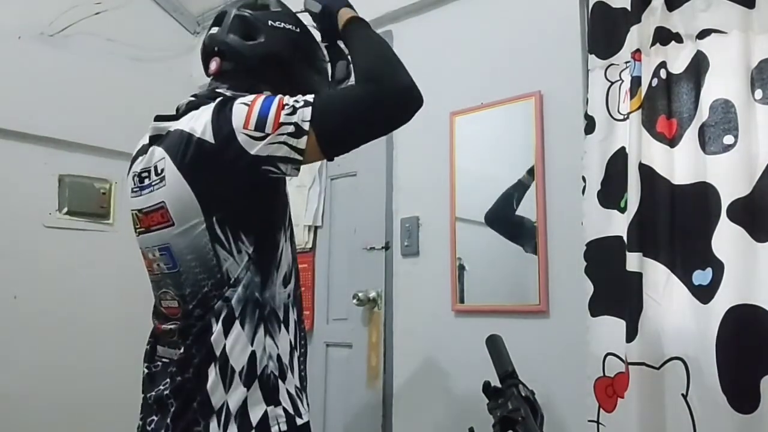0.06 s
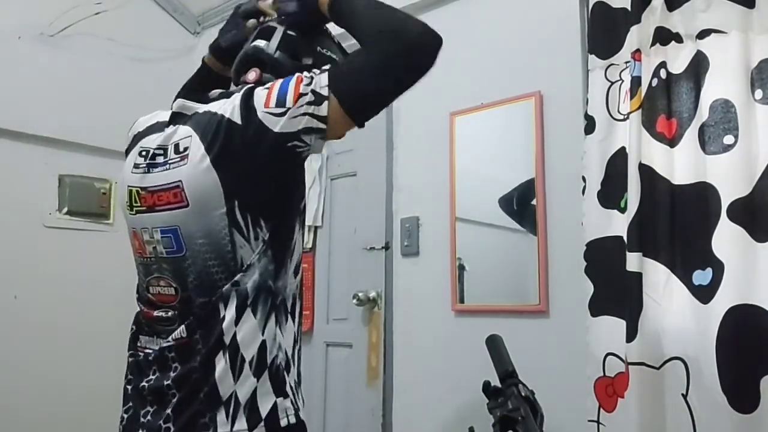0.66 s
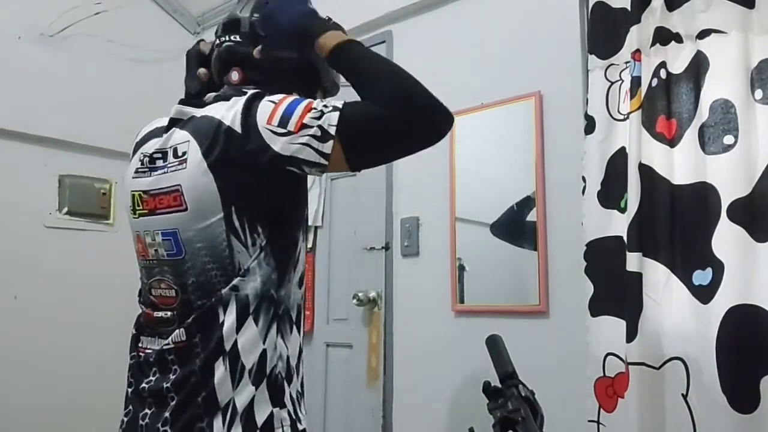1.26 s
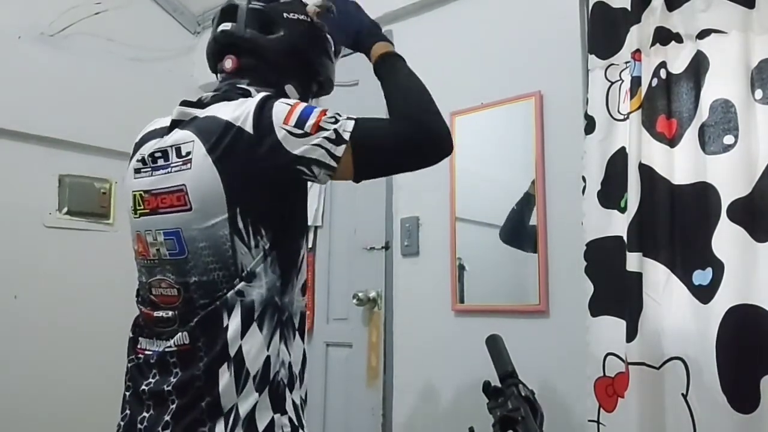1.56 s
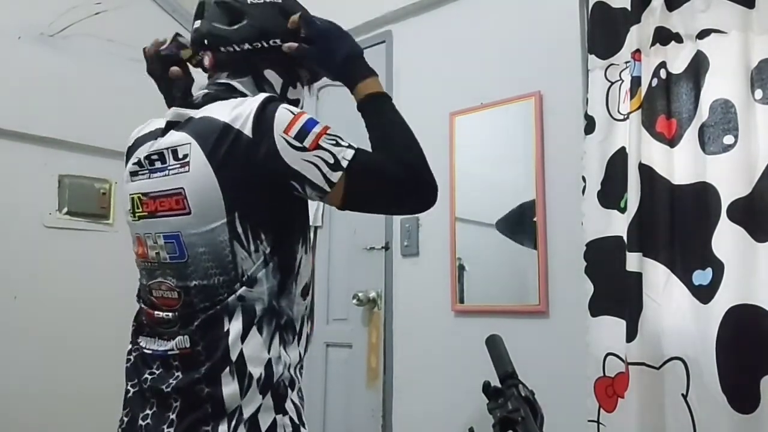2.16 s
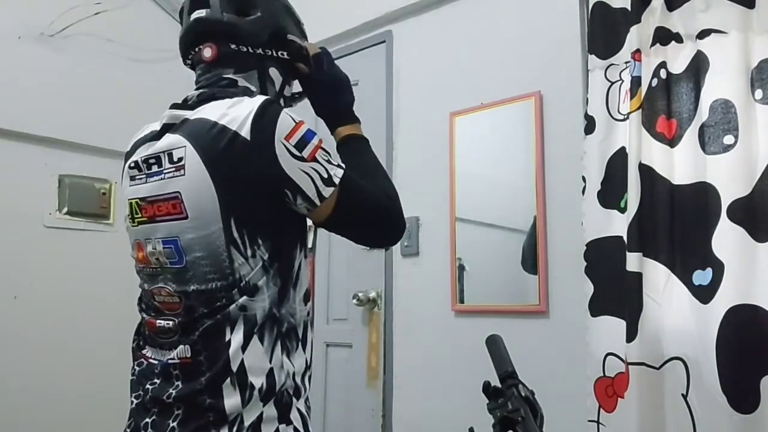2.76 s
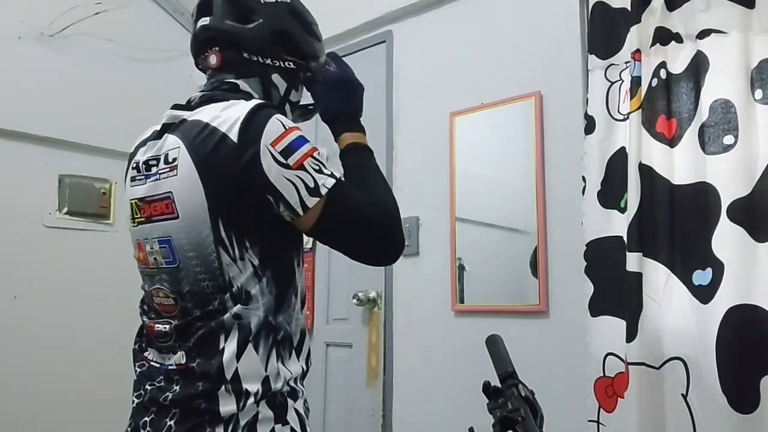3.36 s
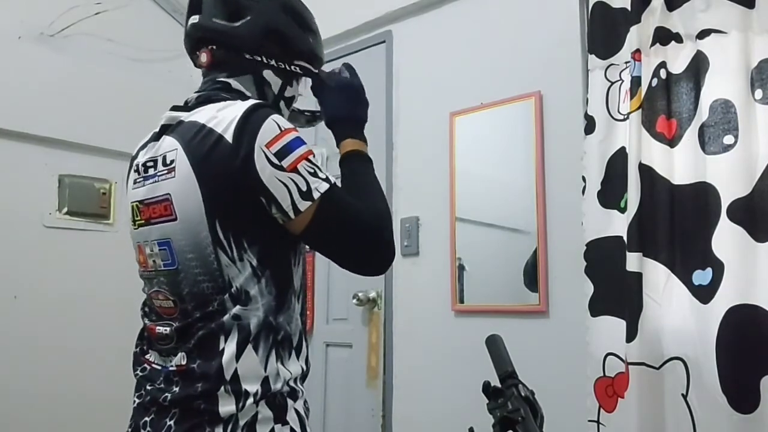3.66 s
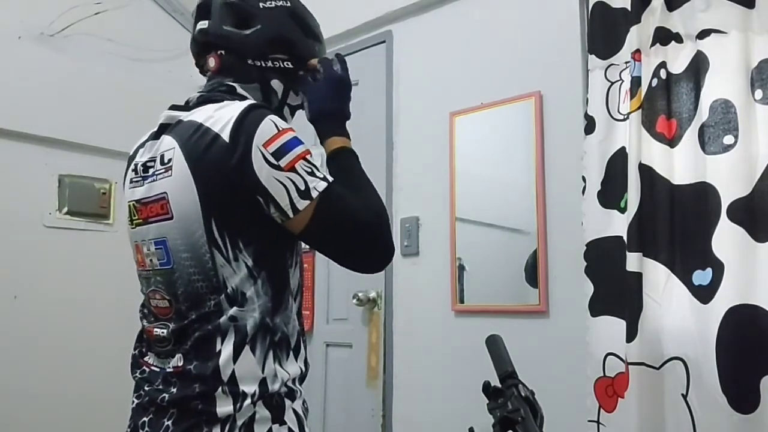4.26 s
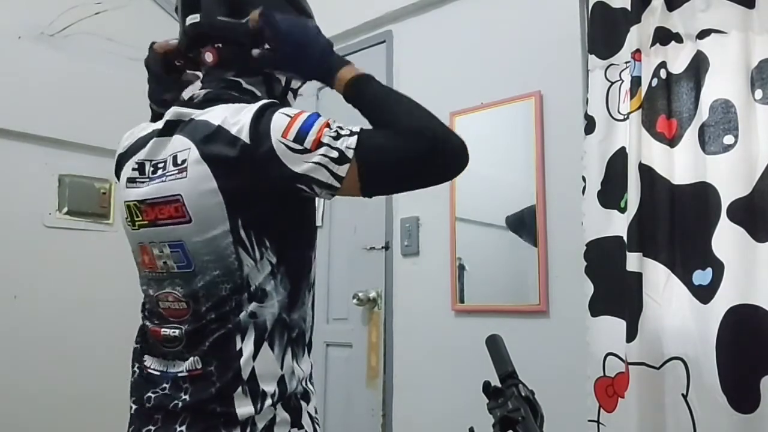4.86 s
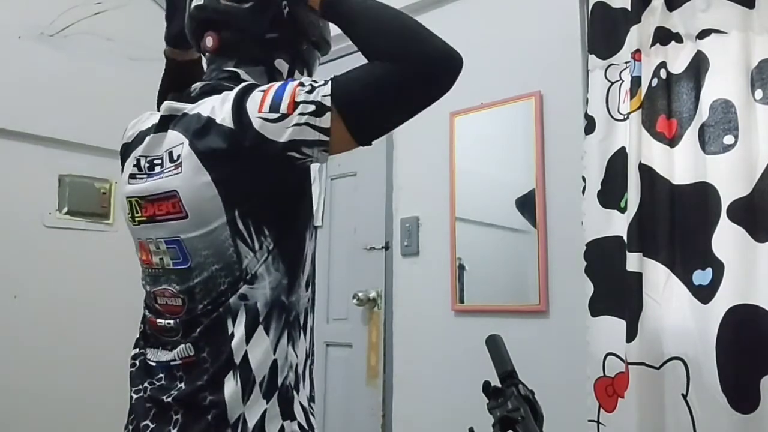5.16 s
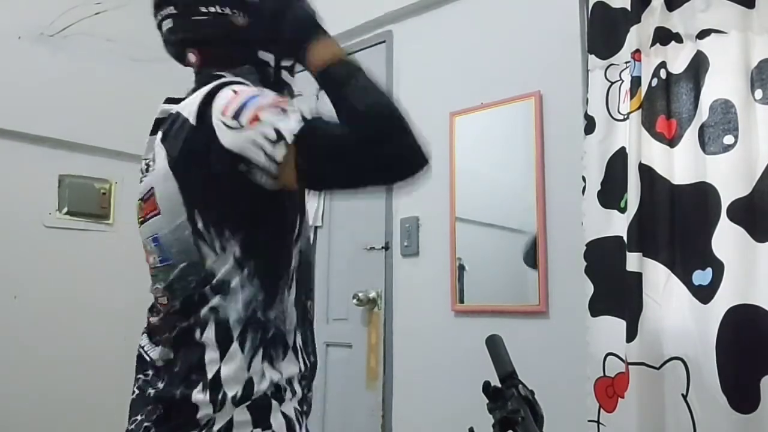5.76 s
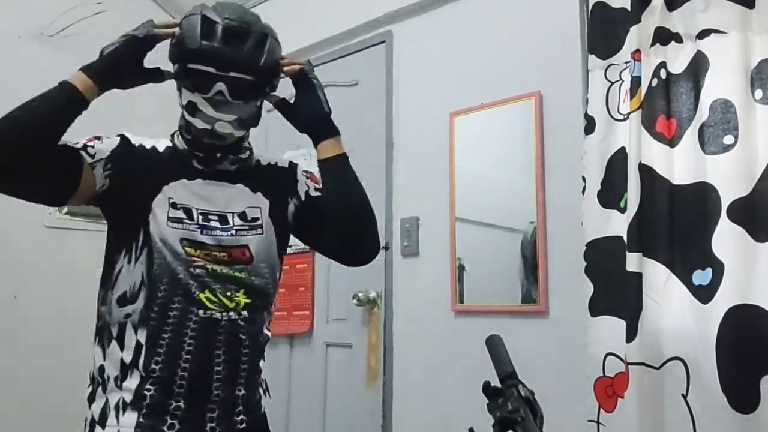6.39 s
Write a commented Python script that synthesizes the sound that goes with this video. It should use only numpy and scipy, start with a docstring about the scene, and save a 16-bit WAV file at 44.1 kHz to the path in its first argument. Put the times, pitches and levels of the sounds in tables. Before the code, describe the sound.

Light plastic clicks open the scene as a helmet is pushed into place, followed by swishes of gloves and a cloth mask. Two sharper snaps stand out before a quieter stretch of small ticks; then come muffled palm thuds, more rustling and a few more taps. Everything is heard from a few steps away, with short echoes from a small room, a soft steady rush and occasional faint, high chirps.

```python
"""Taps, thuds and rubbing: gloved hands settle a cycling helmet, glasses and a cloth mask.
Plastic parts snap against the shell and make it ring briefly, and palms thud on the padding.
Gloves and cloth hiss as their fibres catch and let go. Faint, high chirps come and go.
The small, hard-walled room has a low rush of its own. The microphones stand a few steps away,
so every sound arrives mixed with its echoes from the walls."""
import sys
import numpy as np
from scipy import signal
from scipy.fft import rfft, irfft
from scipy.io import wavfile
from scipy.ndimage import uniform_filter1d

SR = 44100
rng = np.random.default_rng(int(sys.argv[2]) if len(sys.argv) > 2 else 0)


def unload_wav(signal):
    """Save mono or channel-first audio to the path in sys.argv[1] as 16-bit WAV at rate SR, clipped to [-1, 1]."""
    wavfile.write(
        sys.argv[1],
        SR,
        np.round(np.clip(np.atleast_2d(signal).T, -1, 1) * 32767).astype(np.int16),
    )


N = 287861
TIME = np.arange(N) / SR

# tones of the helmet shell and its air pockets: (pitch [Hz], time to fade by 60 dB [s], level [dB])
SHELL_TONES = [(348, 0.014, 0), (590, 0.015, 0.5), (745, 0.028, -2), (847, 0.018, -1.5), (1044.6, 0.027, 0),
               (1063.4, 0.022, 1.5), (1205, 0.012, 1), (1330, 0.012, 0)]
# tones of the stiff rim, dial and glasses: (pitch [Hz], time to fade by 60 dB [s], level [dB])
RIM_TONES = [(1426, 0.0088, 2.5), (1723, 0.034, -3.5), (2010, 0.0098, 3.5), (2486, 0.011, 3),
             (2747, 0.0094, 0.5), (3344, 0.0079, -4.5), (3910, 0.035, -10.5), (4570, 0.003, -6.5)]
# the sharp snap that starts a tap: (frequency [Hz], level [dB])
SNAP_SPECTRUM = [(300, -71), (1500, -4.5), (3500, 0.5), (5500, -4.5), (7500, 1.5), (10500, -7),
                 (14000, -8.5), (16000, -7)]


def undb(db):
    """Turn decibels into a number to multiply a sound by."""
    return 10 ** (np.asarray(db) / 20)


def unit(x):
    """Scale a signal to an average size (rms) of 1."""
    return x / np.sqrt(np.mean(x ** 2))


def along(points, hz):
    """Read between (frequency, value) points, with every octave equally wide."""
    frequencies, values = np.transpose(points)
    return np.interp(np.log(hz + 1), np.log(frequencies), values)


def bins(x):
    """The frequencies in the spectrum of x."""
    return np.fft.rfftfreq(x.shape[-1], 1 / SR)


def colour(x, points):
    """Turn each frequency up or down, following (frequency [Hz], gain [dB]) points."""
    return irfft(rfft(x) * undb(along(points, bins(x))), x.shape[-1])


def walk(per_s):
    """A smooth random wobble of size 1 that finds a new value per_s times a second."""
    step = int(SR / per_s)
    stairs = np.repeat(rng.standard_normal(N // step + 1), step)
    return unit(uniform_filter1d(stairs, step)[:N])


def diffuse(pair):
    """Sound from all sides of a room is alike left and right in the bass, but not in the treble."""
    # how alike the two channels are: (frequency [Hz], likeness [0 to 1])
    likeness = [(40, 0.77), (150, 0.93), (350, 0.72), (700, 0.44), (1300, 0), (15000, 0)]
    alike = along(likeness, bins(pair))
    mid, side = rfft(pair)
    mid, side = mid * np.sqrt(1 + alike), side * np.sqrt(1 - alike)
    return irfft([mid + side, mid - side], pair.shape[-1])


def room(rise_s=0.0016, size=12000, early_db=-1, tail_db=1):
    """An echo pattern: a cluster of tiny impacts and near echoes, then a tail that dulls as it fades."""
    # how long the room rings: (frequency [Hz], time to fade by 60 dB [s])
    echo_times = [(150, 0.32), (1000, 0.17), (4000, 0.21), (14000, 0.16)]
    t = np.arange(size) / SR
    rise = t / rise_s
    early = rng.standard_normal((2, size)) * rise ** 2 * np.exp(-2 * rise)
    early /= np.linalg.norm(early, axis=1, keepdims=True)
    noise, tail = rfft(rng.standard_normal((2, size))), 0
    centres, fade_times = np.transpose(echo_times)
    for band, fade_s in zip(np.eye(len(centres)), fade_times):
        share = along(np.transpose([centres, band]), bins(t))
        fade = np.exp(-np.log(1000) * t / fade_s)
        tail = tail + irfft(noise * share, size) * fade * (1 - np.exp(-rise))
    tail /= np.linalg.norm(tail, axis=1, keepdims=True)
    return diffuse(undb(early_db) * early + undb(tail_db) * tail)


def heard(x, echoes):
    """Carry a sound through the room's echo pattern."""
    return signal.fftconvolve(np.atleast_2d(x), echoes, axes=1)


def blurred(x):
    """The walls smear a long sound, leaving it about as loud."""
    echoes = room()
    return heard(x, echoes / np.linalg.norm(echoes, axis=1, keepdims=True))[:, :N]


def add(out, time_s, sound, db, size=880):
    """Mix in a sound so that its first `size` samples have the level db."""
    start = int(time_s * SR)
    gain = undb(db) / np.sqrt(np.mean(sound[:, :size] ** 2))
    out[:, start:start + sound.shape[1]] += gain * sound[:, :N - start]


def ring(tones, spot_hz=2000, focus_db=0, detune=0.029, scatter_db=0.5, size=2400):
    """Struck plastic rings in fading tones, each shifted a little by the grip."""
    hz, fade_s, db = np.transpose(tones)[:, :, None]
    shift, strength = rng.standard_normal((2, len(tones), 1))
    # a tone loses focus_db for each octave it lies from spot_hz
    db = db - focus_db * abs(np.log2(hz / spot_hz)) + scatter_db * strength
    t = np.arange(size) / SR
    signs = (-1) ** np.arange(len(tones))[:, None]
    waves = signs * np.sin(2 * np.pi * hz * (1 + detune * shift) * t)
    sound = np.sum(undb(db) * waves * np.exp(-np.log(1000) * t / fade_s), axis=0)
    # a small object gives off little sound below its lowest tone
    bass_cut = signal.butter(2, 0.41 * hz.min(), "high", fs=SR, output="sos")
    return signal.sosfilt(bass_cut, sound)


def pulse(spectrum, size=2048):
    """One sudden push: the shortest pulse with the given (frequency [Hz], level [dB]) spectrum."""
    cepstrum = irfft(np.log(undb(along(spectrum, bins(np.zeros(size))))))
    # folding the second half onto the first packs the energy at the start
    cepstrum[1:size // 2] *= 2
    cepstrum[size // 2 + 1:] = 0
    return irfft(np.exp(rfft(cepstrum)))


def room_air(level_db=-62.5, waver_db=2.05):
    """The low rush and hiss of the room, wavering gently."""
    # the room's background noise: (frequency [Hz], relative level [dB])
    air_spectrum = [(15, -36), (25, -4), (55, -9), (113, 2), (193, 1), (457, -6.5), (537, -8), (741, -13),
                    (848, -16), (1340, -28.5), (2560, -12.5), (5580, -20.5), (7910, -22), (14300, -28),
                    (15500, -59)]
    rush = unit(colour(diffuse(rng.standard_normal((2, N))), air_spectrum))
    return rush * undb(level_db + waver_db * walk(5.94))


def friction(db, spectrum, uneven_db, slips_per_s=3000):
    """Fibres catch and let go: many tiny slips over a smooth hiss, under a wavering pressure."""
    slips = (rng.random((2, N)) < slips_per_s / SR) * rng.choice([-1, 1], (2, N))
    rough_hiss = unit(slips) + rng.standard_normal((2, N))
    return unit(colour(diffuse(rough_hiss), spectrum)) * undb(db + uneven_db * walk(40))


def rubbing_hands(speed_up_share=0.59):
    """Gloves rub and tick on the shell while mask and straps hiss; each stroke speeds up, then stops."""
    # how busy the hands are between strokes: (time [s], relative level [dB])
    fidgeting = [(0, -61.5), (0.5, -57), (0.85, -71), (1.8, -59.5), (2.6, -59.5), (3.1, -68), (4.6, -64.5),
                 (5.45, -62), (5.95, -68.5), (6.5, -65.5)]
    # hand strokes: (fastest moment [s], length [s], relative glove level [dB], cloth level [dB])
    strokes = [(0.221, .14, -63, -49.5), (0.676, 0.63, -58, -52), (0.987, .22, -46, -50.5),
               (1.09, 0.17, -58.5, -52), (1.261, 0.27, -54.5, -48.5), (1.488, 0.12, -47, -46),
               (1.63, 0.23, -56.5, -62), (1.745, .1, -49.5, -68), (1.951, 0.16, -53.5, -52.5),
               (2.059, 0.18, -51.5, -47), (2.247, 0.24, -57, -52.5), (2.415, 0.16, -56, -68),
               (2.55, 0.21, -53, -58), (2.716, 0.096, -46, -63), (3.235, 0.069, -59, -73),
               (3.678, 0.073, -58.5, -60), (4.243, 0.31, -62, -62), (4.55, 0.17, -58.5, -57),
               (5.145, 0.39, -57.5, -51.5), (5.358, 0.11, -65, -44.5), (5.648, 0.074, -51, -55),
               (6.146, .12, -77, -55.5)]
    # a glove sliding on the shell: (frequency [Hz], relative level [dB])
    glove_spectrum = [(60, -33), (200, -5.5), (550, -7.5), (950, 1.5), (1400, -1), (2100, -1.5),
                      (3200, -10), (6000, -14.5)]
    # mask and straps sliding: (frequency [Hz], relative level [dB])
    cloth_spectrum = [(200, -4), (1000, -41), (3000, 3), (5500, -3.5), (7500, -0.5), (10500, -2),
                      (14500, -5), (16000, 7)]
    fidget_db = np.interp(TIME, *np.transpose(fidgeting))
    rub_power, cloth_power = undb(fidget_db - 1) ** 2, undb(fidget_db + 0.5) ** 2
    for peak_s, length_s, glove_db, fabric_db in strokes:
        start_s = peak_s - speed_up_share * length_s
        speed = np.interp(TIME, [start_s, peak_s, start_s + length_s], [0, 1, 0])
        rub_power += (speed * undb(glove_db)) ** 2
        cloth_power += (speed * undb(fabric_db)) ** 2
    rub_db, cloth_db = 10 * np.log10(rub_power), 10 * np.log10(cloth_power)
    gloves = friction(rub_db - 2, glove_spectrum, uneven_db=3.33) + light_ticks(rub_db)
    return gloves + friction(cloth_db, cloth_spectrum, uneven_db=1.8)


def light_ticks(rub_db, per_s=28, level_db=-64, follow=0.43, spread_db=3.5, spots=10):
    """Fingertips, strap and glasses tick on different spots of the rim, louder while the hands rub."""
    out, snap = np.zeros(N), unit(pulse(SNAP_SPECTRUM, size=2400))
    for _ in range(spots):
        hits = rng.random(N) < per_s / spots / SR
        strength = undb(spread_db * np.minimum(rng.exponential(size=N), 2.5))
        spot_hz = 980 * 2 ** (0.28 * rng.standard_normal())
        shell = unit(ring(SHELL_TONES, spot_hz, focus_db=17, detune=0.052))
        rim = unit(ring(RIM_TONES, detune=0.065))
        out += signal.oaconvolve(hits * strength, rim + 0.75 * shell + 0.5 * snap)[:N]
    return unit(blurred(out * undb(follow * rub_db))) * undb(level_db)


def helmet_taps():
    """Each tap snaps and rings the shell and rim; the head moves, so each has its own echoes."""
    # taps on plastic: (time [s], strength [dB], place [0 shell to 1 rim], hardness [0 glove to 1 plastic])
    taps = [(0.038, -33.5, 0.24, 0.11), (0.045, -41.5, 0.63, 0.26), (0.128, -32.5, 0.77, 0.44),
            (0.161, -39.5, 0.55, 0.4), (0.419, -55, 0.91, .2), (0.472, -45.5, .58, 0.53),
            (0.512, -54, 0.93, .83), (0.654, -48.5, 0.37, 0.34), (1.313, -55.5, .3, 0.87),
            (1.439, -50, 0.41, .5), (1.491, -39.5, 1, 0.86), (1.495, -29, 0.4, 0.72),
            (1.844, -44.5, 0.46, 0.11), (2.195, -43.5, 0.52, 0.23), (2.277, -41, 0.4, 0.078),
            (2.49, -49, 0.37, 0.38), (2.531, -50.5, .45, .53), (2.558, -38.5, 0.32, 0.35),
            (2.677, -44.5, 0.53, 0.2), (2.742, -26.5, 0.94, 0.68), (2.864, -40, 0.66, 0.9),
            (3.079, -52.5, 0.65, 0.36), (3.15, -57, 1, .05), (3.592, -54, 0.66, .2),
            (3.865, -52.5, 0.53, .15), (4.04, -54, 0.81, .05), (4.11, -57.5, 0.85, 0.56),
            (4.22, -46.5, 0.28, 0.23), (4.372, -48.5, 0.36, .3), (4.478, -55, 0.55, 0.42),
            (4.704, -55, 0.29, .77), (4.961, -55.5, .47, 0.55), (5.184, -44, 0.26, 1),
            (5.368, -42.5, 0.58, 1), (5.598, -47.5, 0.5, 0.15), (5.688, -44, 0.48, 0.64),
            (5.929, -39, 0.22, 0.22), (6.234, -56, .55, 0.28), (6.318, -57.5, 0.4, 0.078),
            (6.495, -57.5, 0.11, 0.2)]
    out, snap = np.zeros((2, N)), pulse(SNAP_SPECTRUM)
    for time_s, db, place, hardness in taps:
        rim_share = np.clip(place, 0.01, 0.99)
        # a harder tap rings the shell higher, chatters longer before its peak and snaps more
        spot_hz = 900 * (1330 / 900) ** hardness
        rise_s = np.interp(hardness, [0, 1], [0.00094, 0.0032])
        snap_db = np.interp(hardness, [0, 1], [-27, 4])
        shell = heard(ring(SHELL_TONES, spot_hz, focus_db=19), room(rise_s))
        rim = heard(ring(RIM_TONES, spot_hz=1530, focus_db=3), room(rise_s))
        add(out, time_s, shell, db + 20 * np.log10(1 - rim_share))
        add(out, time_s, rim, db + 20 * np.log10(rim_share))
        add(out, time_s, heard(snap, room(rise_s)), db + snap_db)
    return out


def padding_thuds():
    """Palms press the helmet, and its soft padding answers with a dull thud."""
    # presses of a palm: (time [s], level [dB], pitch [times the padding's own])
    presses = [(0.038, -49, 2.8), (1.845, -65, 1.9), (2.743, -54.5, 3.9), (4.217, -47.5, 1.2),
               (4.264, -54.5, 1.1), (5.594, -48.5, 1.4), (5.634, -52, 0.93)]
    # the padding's own thud: (frequency [Hz], relative level [dB])
    thud_spectrum = [(40, -19), (80, -8.5), (130, -2.5), (280, -4), (450, -12.5), (900, -30.5), (2000, -45)]
    out = np.zeros((2, N))
    for time_s, db, pitch in presses:
        thud = pulse([(hz * pitch, band_db) for hz, band_db in thud_spectrum])
        add(out, time_s, heard(thud, room(rise_s=0.0093)), db)
    return out


def narrow_hiss(hz, width_hz):
    """Smoothed noise carried on a moving pitch makes a hiss that is almost a whistle."""
    smoothing = signal.butter(2, width_hz / 2.2, fs=SR, output="sos")
    flutter = signal.sosfilt(smoothing, rng.standard_normal((2, 2, len(hz))))
    phase = 2 * np.pi * np.cumsum(hz) / SR
    return unit(flutter[0] * np.cos(phase) + flutter[1] * np.sin(phase))


def faint_chirps(boost_db=1, wander=0.0315, upper_ratio=1.47, upper_db=-11):
    """Faint, short, high chirps: two bands of hiss that glide and wobble."""
    # chirps: (time [s], length [s], first pitch [Hz], last pitch [Hz], width [Hz], relative level [dB])
    chirps = [(0.4, 0.091, 3420, 3360, 300, -60.5), (0.541, 0.12, 4690, 3830, 1310, -53.5),
              (0.72, 0.21, 2990, 2730, 500, -65), (1.32, 0.073, 3690, 4000, 450, -64),
              (1.54, 0.085, 4140, 4460, 600, -56), (2.908, 0.065, 4740, 4110, 1310, -59),
              (2.978, 0.093, 2780, 3070, 400, -60.5), (3.589, 0.11, 4360, 4080, 700, -62.5),
              (3.788, 0.075, 4980, 4600, 1200, -64), (3.849, 0.12, 3130, 3010, 400, -65.5),
              (4.027, 0.14, 2543, 3240, 450, -61), (4.155, 0.2, 4740, 3900, 1600, -57.5),
              (4.52, 0.089, 4050, 4100, 1890, -52), (4.732, 0.073, 4200, 4240, 199, -63),
              (4.963, 0.17, 3960, 4430, 1700, -57.5), (5.487, 0.094, 5150, 3810, 1200, -54),
              (5.766, 0.16, 3390, 3050, 900, -64.5), (6.016, 0.082, 2600, 3300, 450, -64),
              (6.081, 0.088, 4760, 5000, 800, -59.5), (6.283, 0.095, 3300, 4000, 1400, -65.5)]
    out, wobble = np.zeros((2, N)), 1 + wander * walk(55)
    for time_s, length_s, first_hz, last_hz, width_hz, db in chirps:
        start, size = int(time_s * SR), int(length_s * SR)
        progress = np.linspace(0, 1, size)
        hz = (first_hz + (last_hz - first_hz) * progress) * wobble[start:start + size]
        hiss = narrow_hiss(hz, width_hz) + undb(upper_db) * narrow_hiss(upper_ratio * hz, width_hz)
        out[:, start:start + size] += undb(db + boost_db) * hiss * np.sin(np.pi * progress)
    return blurred(out)


def scene():
    """Taps, thuds, rubbing and faint chirps over the air of the room."""
    return helmet_taps() + padding_thuds() + rubbing_hands() + faint_chirps() + room_air()


def record(dry):
    """The two microphones differ a little in tone, and the highest treble is cut off."""
    # the right microphone is duller at the very top: (frequency [Hz], left minus right [dB])
    balance = [(100, 1.7), (400, 1), (1500, 1), (4400, 2), (8000, 1), (10000, -1.5), (13000, 4),
               (16000, 3.5)]
    left = colour(dry[0], [(hz, db / 2) for hz, db in balance])
    right = colour(dry[1], [(hz, -db / 2) for hz, db in balance])
    treble_cut = signal.ellip(10, 0.2, 70, 15600, fs=SR, output="sos")  # above 15600 Hz
    return signal.sosfilt(treble_cut, [left, right])


dry = scene()
out = record(dry)
unload_wav(out)
```